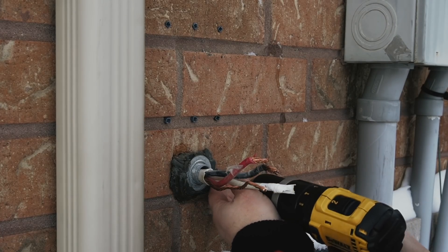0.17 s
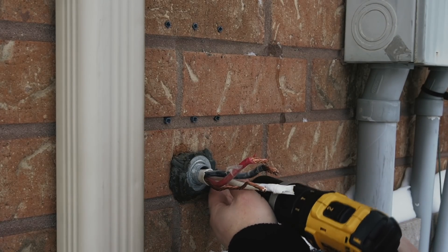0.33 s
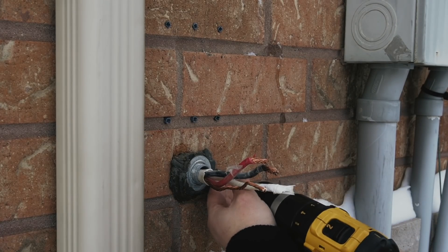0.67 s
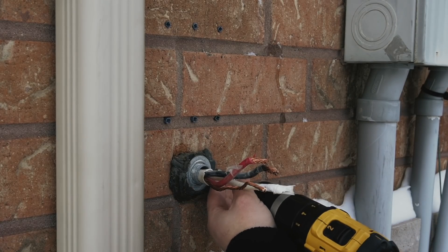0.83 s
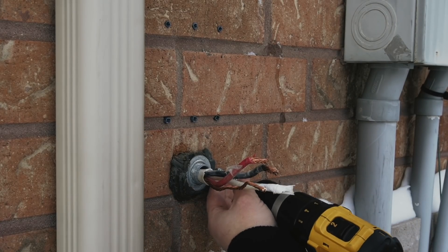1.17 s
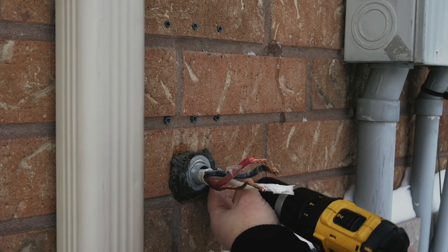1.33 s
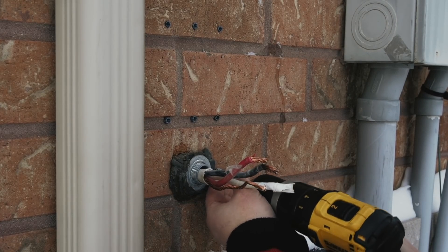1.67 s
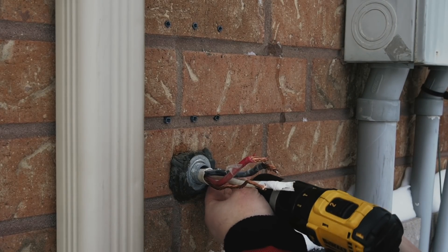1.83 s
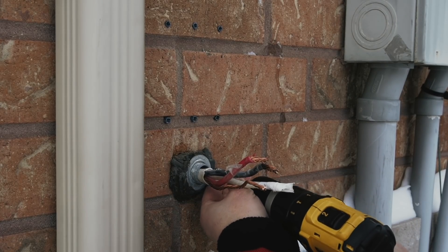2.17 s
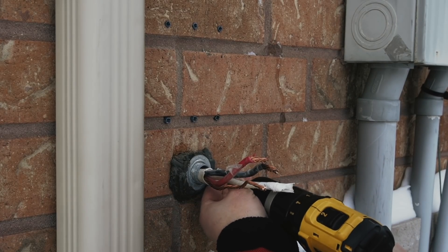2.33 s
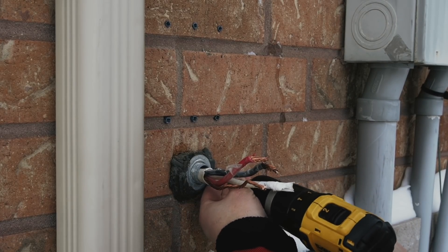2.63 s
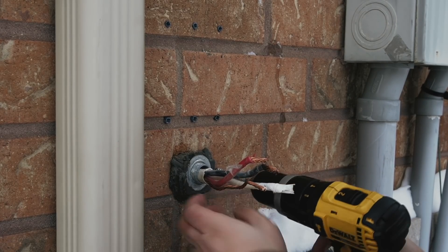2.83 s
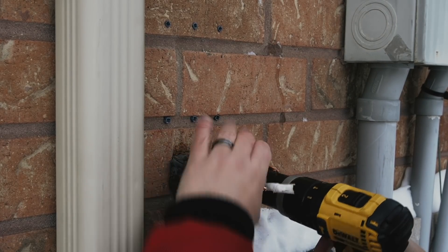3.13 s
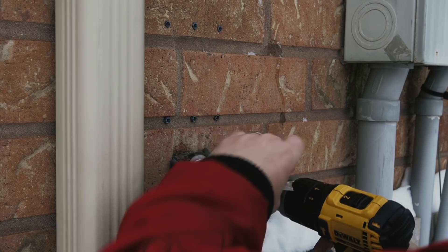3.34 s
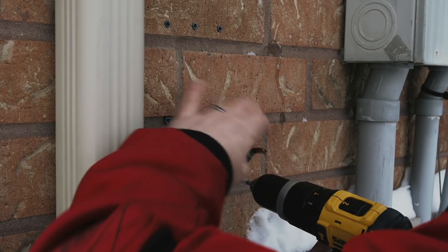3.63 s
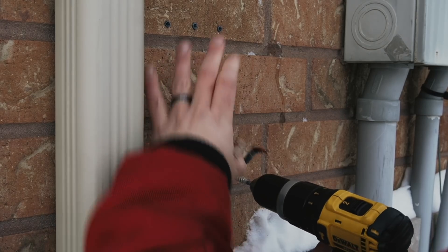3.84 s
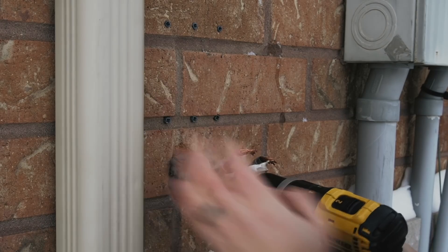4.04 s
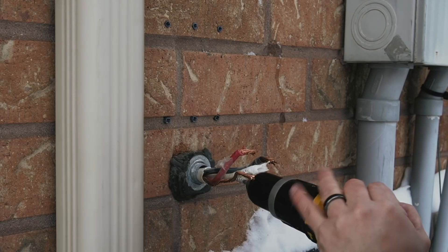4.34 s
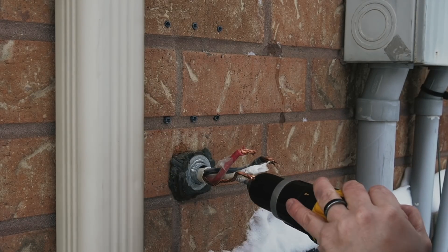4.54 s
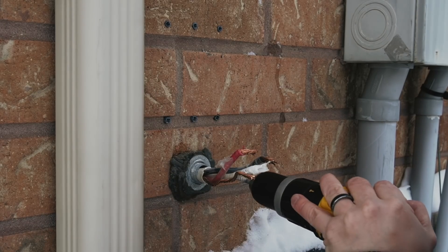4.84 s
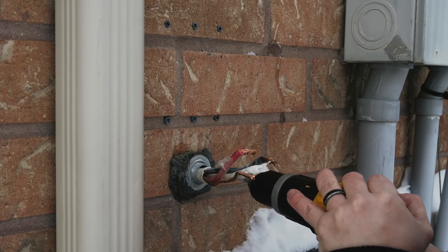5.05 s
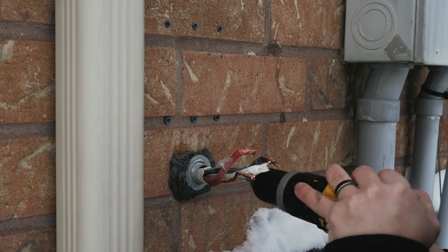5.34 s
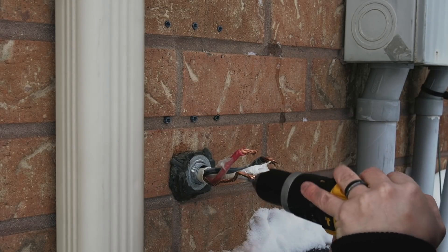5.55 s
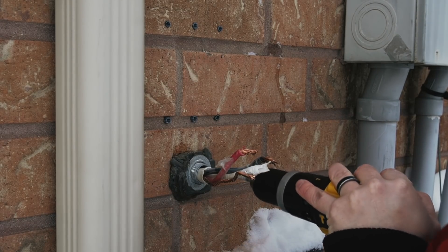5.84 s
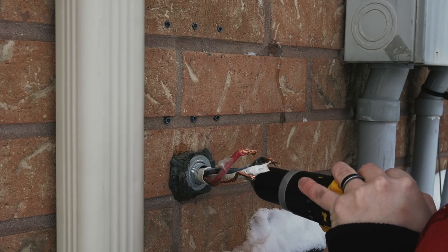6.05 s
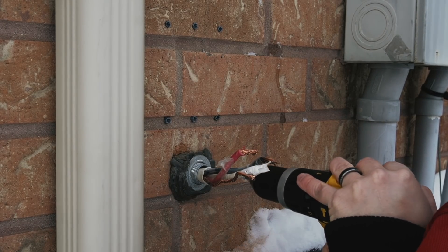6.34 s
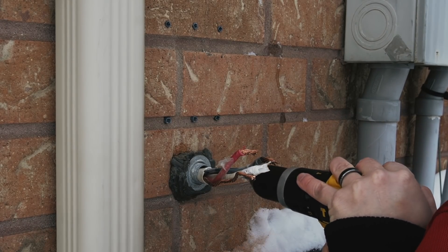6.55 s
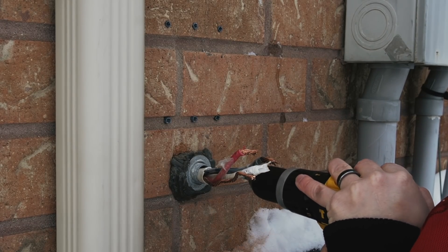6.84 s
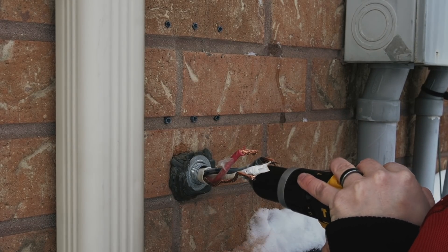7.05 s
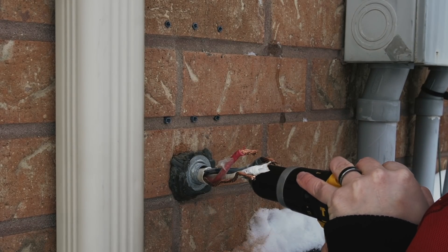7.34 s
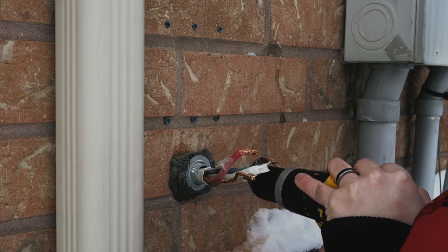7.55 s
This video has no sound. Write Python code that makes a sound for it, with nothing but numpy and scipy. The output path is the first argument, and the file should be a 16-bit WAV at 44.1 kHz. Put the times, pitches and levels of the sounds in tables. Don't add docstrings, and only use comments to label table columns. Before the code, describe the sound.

Outdoors, very close to a hammer drill against brick. From 0 to 0.5 s the chuck creeps: about seventeen uneven, bright ratchet clacks with dull thuds slow down under a thin whistle near 4 kHz. Small grip creaks and faint wind fill the gap until a lone clack at 1.4 s. Two more blows lead into a rough run at 1.7 s, hammering around 47 blows a second, then rising near 2.4 s to a dense rattle of about 130, stopping at 2.85 s. In the pause come light clinks at 3.1 s, ticks around 3.7 s, a hard knock at 4.0 s and sharp switch clicks at 4.26 and 4.36 s. Whistle and gritty grinding return at 4.5 s; the blows accelerate and by 5.4 s merge into a harsh, slightly wavering buzz near 430-460 Hz, steady to the end at 7.7 s. Faint yard echo and far wash.

```python
import sys
import numpy as np
from scipy import signal
from scipy.io import wavfile
from scipy.ndimage import uniform_filter1d

SR = 44100
rng = np.random.default_rng(int(sys.argv[2]) if len(sys.argv) > 2 else 0)


def amp(db):
    return 10 ** (np.asarray(db, float) / 20)


def write(x):
    x = np.atleast_2d(x).T
    wavfile.write(sys.argv[1], SR, np.round(np.clip(x, -1, 1) * 32767).astype(np.int16))


N = 339129


def evened(x):
    return x / np.sqrt(np.mean(x ** 2) + 1e-20)


def drift(size):
    return evened(uniform_filter1d(uniform_filter1d(rng.standard_normal(N), size), size))


def read(points, hz):
    f, value = np.transpose(points)
    return np.interp(np.log(hz + 1), np.log(f + 1), value)


def add(mix, s, sound):
    part = mix[round(s * SR):][:len(sound)]
    part += sound[:len(part)]


def colour(x, shape_db):
    hz = abs(np.fft.fftfreq(8192, 1 / SR))
    log_gain = np.log(amp(np.maximum(shape_db(hz), -100)))
    taps = np.fft.ifft(np.exp(np.conj(signal.hilbert(log_gain)))).real[:4096]
    return signal.oaconvolve(x, taps / np.linalg.norm(taps))[:len(x)]


def slope(hz, corner_hz, db_per_octave):
    return -np.maximum(db_per_octave * np.log2((hz + 1) / corner_hz), 0)


def poles_at(hz, width):
    r = np.exp(-np.pi * width / SR)
    return [1, -2 * r * np.cos(2 * np.pi * hz / SR), r * r]


def resonate(x, hz, width):
    return signal.lfilter([1, 0, -1], poles_at(hz, width), x)


def dispersed(x, hz, width):
    poles = poles_at(hz, width)
    return signal.lfilter(poles[::-1], poles, x)


def bursts(train, delay_s, t60, rise_s):
    t = np.maximum(np.arange(2048) / SR - delay_s, 0)
    power = (1 - np.exp(-t / rise_s)) ** 2 * amp(-120 * t / t60)
    envelope = np.sqrt(abs(signal.oaconvolve(train ** 2, power / power.sum())[:N]))
    return envelope * rng.standard_normal(N)


# t/s, level/dB
SLOW_RUN = [
    (1.682, -20.5),
    (1.85, -18),
    (1.95, -18.5),
    (2.07, -15),
    (2.33, -16),
    (2.42, -13),
    (2.79, -14.5),
    (2.832, -19),
    (2.85, -61),
]
FAST_RUN = [
    (4.583, -18),
    (5.05, -19),
    (5.45, -20.5),
    (7.69, -21.5),
]
# t/s, blows per second f/Hz
SLOW_RATE = [(1.682, 47.4), (2.045, 47.4), (2.1, 60), (2.31, 66), (2.41, 117), (2.47, 125), (2.62, 130),
             (2.72, 128), (2.85, 104)]
SPIN_UP = [(4.583, 99.6), (4.65, 147.4), (4.85, 90.26), (4.91, 149.9), (5.02, 231.5), (5.11, 396.3),
           (5.18, 453.7), (5.27, 411.4), (5.42, 469)]
FULL_RATE = [(5.47, 459), (5.85, 446.5), (6.03, 441), (6.31, 437.7), (6.66, 442), (7.19, 426.5),
             (7.3, 430.3), (7.62, 425), (7.69, 430)]
RUN_TRIM_DB = [-1, 4.5]
TICK_DB = [-10, 0.5]
PUSH_DB = [-2, 3.5]
# t/s, peak level/dB, tick over the blow level/dB
BLOWS = [(0.0014, -4, -8), (0.0231, -5.5, -4), (0.0503, -10, -6), (0.0732, -12.5, -15), (0.0868, -9.5, -7),
         (0.1072, -9.5, -14), (0.124, -9, -9), (0.1486, -6.5, -4), (0.172, -12, -12), (0.1874, -12, -16),
         (0.205, -9, -6), (0.2324, -22, -8), (0.259, -8.5, -26), (0.3061, -10, -9), (0.3561, -10.5, -9.5),
         (0.4094, -16, -12), (0.5137, -23, -20), (1.4225, -4.5, -33), (1.6013, -3.5, -6), (1.6466, 0.5, -9),
         (4.5262, 5, -12), (4.566, 5.5, -9)]
TEETH = 17
WORN_DB, TICK_SPREAD_DB = .8, 2.5
TICK_DB_PER_OCTAVE = 3.2
LOOSE_TICK_DB = 1.5
LOCKED_PUSH_DB, LOCKED_THUD_DB = -29, -4
SLACK_HZ, SLACK_WIDTH_HZ, SLACK_DB = 2253, 650, -17


def drill_run(layers, worn, speed, effort, trim_db, snap_db, shove_db):
    clatter, tick, push, thud = layers
    s, effort_db = np.transpose(effort)
    start = speed[0][0]
    t = np.arange(start, s[-1], 1 / SR)
    rate = np.interp(t, *np.transpose(speed))
    clatter_db = np.interp(t, s, effort_db)
    chatter = loose(t)
    fast = np.clip(rate / 200 - 1, 0, 1)
    octaves = np.log2(rate / rate.max())
    tick_db = clatter_db + snap_db + TICK_DB_PER_OCTAVE * octaves + LOOSE_TICK_DB * chatter * fast
    push_db = clatter_db + shove_db + LOCKED_PUSH_DB * (1 - chatter) - 5.2 * fast
    thud_db = clatter_db + trim_db - 7 + LOCKED_THUD_DB * (1 - chatter)

    at = np.flatnonzero(np.diff(np.floor(np.cumsum(rate) / SR), prepend=-1))
    teeth = np.zeros(len(t))
    teeth[at] = np.sqrt(SR / rate[at])
    uneven = teeth * amp(1.6 * rng.standard_normal(N)[:len(t)])
    uneven[at] *= amp(WORN_DB * np.resize(worn, len(at)))
    seated = amp(-22 * np.clip((rate - 220) / 200, 0, 1))
    steadier = teeth + chatter * (uneven - teeth)

    add(clatter, start, uneven * amp(clatter_db + trim_db))
    add(tick, start, uneven * amp(tick_db + TICK_SPREAD_DB * rng.standard_normal(N)[:len(t)]))
    add(push, start, (0.51 * teeth + 0.19 * steadier) * amp(push_db))
    add(thud, start, uneven * np.sqrt(seated) * amp(thud_db))


def hammer():
    clatter, tick, push, thud, lone = np.zeros((5, N))
    worn = evened(rng.standard_normal(TEETH))
    speeds, efforts = (SLOW_RATE, SPIN_UP + FULL_RATE), (SLOW_RUN, FAST_RUN)
    for run in zip(speeds, efforts, RUN_TRIM_DB, TICK_DB, PUSH_DB):
        drill_run((clatter, tick, push, thud), worn, *run)
    for s, peak_db, tick_db in BLOWS:
        add(lone, s, np.array([amp(peak_db + 7)]))
        add(tick, s, np.array([amp(peak_db + tick_db + 6.0)]))
        add(push, s, np.array([amp(peak_db + 1.5)]))
        add(thud, s, np.array([amp(peak_db + 0.5)]))

    early = np.roll(tick, -round(0.00362 * SR))
    bright = 0.71 * bursts(early, 0, 0.02, 0.0002) + .7 * bursts(tick, 0, 0.009, 0.0005)
    rattle = bursts(clatter, 0, 0.016, 0.0018)
    rattle += 0.3 * bursts(clatter, 0.0069, 0.031, 0.0019)
    rattle += bursts(lone, 0, 0.019, 0.0012)
    slack = rattle * (np.arange(N) < SR * SLOW_RUN[-1][0] + 2000)
    chuck = resonate(resonate(slack, SLACK_HZ, SLACK_WIDTH_HZ), SLACK_HZ, SLACK_WIDTH_HZ)
    rattle += amp(SLACK_DB) * np.std(slack) * evened(chuck)
    dull = bursts(thud, 0, 0.064, 0.011)

    out = colour(bright, lambda hz: tool_db(hz) + slope(hz, 5550, -11.5))
    out += colour(rattle, lambda hz: tool_db(hz) + slope(hz, 1098, -22.5) + slope(hz, 5870, 19.0))
    out += colour(dull, lambda hz: tool_db(hz) + slope(hz, 970, 11.8) + slope(hz, 250, -15))
    seat = np.roll(push, round(.0006 * SR))
    for hz in (500, 1000, 1900, 3300, 5500):
        seat = dispersed(seat, hz, .6 * hz)
    return out + colour(seat, lambda hz: tool_db(hz) + slope(hz, 530, 8.0))


# f/Hz, level/dB per Hz
TOOL = [(60, -24), (100, -3.5), (200, -9.5), (450, -5.5), (1100, 0), (1500, -2), (3500, -6.5), (6300, -15),
        (8000, -16.5), (14500, -21), (15700, -20.5), (16300, -57)]
# f/Hz, width f/Hz, level/dB
MODES_OF_TOOL = [(142.6, 59, 8.5), (219, 64, 8), (344, 53, 9.5), (561, 57, 11.5), (686.6, 66, 9.5),
                 (1343, 144, 3.5), (1500, 213, 8.5), (1857, 45, -4.5), (2020, 850, 4), (3030, 270, 6),
                 (4280, 1100, 8.5), (7705, 1820, 10.5), (8770, 2100, 5.5), (10480, 540, -8),
                 (13000, 5800, 11.5)]


def tool_db(hz):
    return read(TOOL, hz) + sum(db / (1 + (2 * (hz - f) / w) ** 2) for f, w, db in MODES_OF_TOOL)


LOCK_S, LOCK_SPAN_S = 5.42, .15


def loose(t):
    return np.clip((LOCK_S - t) / LOCK_SPAN_S, 0, 1)


# t/s, level/dB
SINGING = [
    (4.98, -37),
    (5.14, -22.5),
    (5.26, -23),
    (5.42, -19.5),
    (6.0, -19),
    (7.69, -19),
]
SINGING_HZ = [427, 440, 456, 500]
# multiple, then level/dB over the song at each of those four rates
SINGING_ORDERS = [(1, -8.5, 0, 1, -4.5), (2, 0.5, 0, 0, -1), (3, 1, -0.5, 1, 0.5), (4, 4.5, 0, -12, -9),
                  (5, -1, -8, -2, -1.5), (6, -16, -16, -16, -9), (7, -10, -6, -18, -15),
                  (9, -17, -25, -19, -19), (10, -14, -14, -12.5, -11), (12, -25, -30, -25, -12)]
SETTLE_S = 0.41
CHUCK_DB, FREE_CHUCK_DB = -36.5, -7
GEAR_ORDER = 12.34


def singing():
    t = np.arange(N) / SR
    song_db = np.interp(t, *np.transpose(SINGING), left=-99)
    rate = np.interp(t, *np.transpose(SPIN_UP + FULL_RATE))
    unsettled = loose(t)
    rough = np.exp(-np.maximum(t - LOCK_S, 0) / SETTLE_S)
    jitter = (.003 + .004 * unsettled + .007 * rough) * drift(size=200)
    blows = np.cumsum(rate * (1 + jitter)) / SR

    flicker_db = 0.49 + 1.3 * unsettled + 1.12 * rough
    tone = np.zeros(N)
    for k, *order_db in SINGING_ORDERS:
        db = song_db + np.interp(rate + 100 * unsettled, SINGING_HZ, order_db)
        level = amp(db + flicker_db * drift(size=400))
        tone += level * np.sin(2 * np.pi * (k * blows + rng.random() * (k > 2)))

    low_orders = np.sin(2 * np.pi * blows) + .35 * np.sin(4 * np.pi * blows)
    chuck = 2 * np.cos(2 * np.pi * blows / TEETH) * low_orders
    chuck *= amp(CHUCK_DB + np.interp(rate, SINGING_HZ[:2], [0, FREE_CHUCK_DB]))
    gear = np.sin(2 * np.pi * GEAR_ORDER * np.cumsum(rate) / SR) * amp(-32.5 + 1.2 * drift(size=1500))
    gear += np.sin(2 * np.pi * .67 * blows) * amp(-46.5 + 2.5 * drift(size=300))
    return np.sqrt(2) * (tone + (chuck + gear * (1 - rough)) * (1 - unsettled))


# on t/s, off t/s, whistle level/dB, grinding level/dB, loading time t/s
THROTTLE = [
    (-.3, .46, -38, -43, .05),
    (1.532, 2.204, -37, -34, 0.028),
    (4.492, 5.027, -28, -25.5, 0.039),
]
WHISTLE_HZ = [3951, 3956, 3960]
# multiple, level/dB
WHISTLE_ORDERS = [(1, 0), (2, -6), (3, -21)]
WHISTLE_FALL_DB_PER_S, GRIND_FALL_DB_PER_S = 4000, 330
GRIND_START_DB = -36
WHISTLE_SHAKE_DB = 5


def throttle():
    whistle, grind = np.zeros((2, N))
    for (on, off, whistle_db, grind_db, lag_s), hz in zip(THROTTLE, WHISTLE_HZ):
        t = np.arange(max(on, 0), off + .3, 1 / SR)
        unloaded = np.exp(-abs(t - on) / lag_s)
        after = np.maximum(t - off, 0)
        tone = sum(amp(db) * np.sin(2 * np.pi * k * hz * t) for k, db in WHISTLE_ORDERS)
        add(whistle, t[0], np.sqrt(2) * tone * amp(whistle_db - WHISTLE_FALL_DB_PER_S * after))
        add(grind, t[0], amp(grind_db + GRIND_START_DB * unloaded - GRIND_FALL_DB_PER_S * after))
    lumps_db = 2.8 * evened(uniform_filter1d(rng.standard_normal(N), 90))
    grit = rng.standard_normal(N) * amp(lumps_db)
    whistle *= amp(WHISTLE_SHAKE_DB * grind / grind.max() * drift(size=120))
    return whistle + colour(grind * evened(grit), lambda hz: 1.03 * tool_db(hz))


# t/s, peak
# level/dB, ring f/Hz, t60 t/s
THUMPS = [
    (.004, -24, 197, .17),
    (.018, -20, 380, 0.12),
    (.185, -28.5, 545, 0.12),
    (2.845, -25.5, 203, .3),
    (2.846, -29, 398, 0.18),
    (4.0181, -1.5, 540, 0.028),
    (4.019, -23, 257, 0.14),
    (4.048, -13.5, 820, 0.062),
    (4.3585, -33, 3500, .012),
    (4.3635, -42, 3500, .012),
]
TICKS = [(0.144, -21, 2300, .033), (0.189, -21, 2670, .05), (.198, -24, 2500, .03), (0.233, -23, 3200, .02),
         (.555, -46, 5500, .015), (.971, -28.5, 1290, 0.046), (.972, -31, 600, .03),
         (3.423, -38, 5000, .012), (3.648, -34, 4500, 0.022), (3.724, -28, 1600, 0.029),
         (3.737, -24.5, 1500, 0.067), (3.995, -39, 4800, .01), (4.019, -7.5, 1260, 0.067),
         (4.024, -18.5, 2200, 0.063), (4.267, -11.5, 7260, 0.012), (4.2665, -27, 3440, 0.0098),
         (4.3, -34, 4000, .03), (3.737, -23.5, 895, 0.051), (3.883, -34, 1500, .02),
         (4.093, -35, 4800, .015), (4.2635, -2, 2660, .017)]
CLINKS = [
    (3.108, -41, 2080, 0.044),
    (3.108, -36, 3940, 0.083),
    (3.109, -36, 7760, 0.071),
    (3.152, -37, 2960, .06),
    (3.152, -29.5, 3960, 0.078),
    (3.152, -33.5, 7900, 0.085),
    (4.018, -18, 8150, 0.034),
    (4.03, -24, 706, .2),
]
SNAPS = [
    (4.2625, -11.5, 1420, 0.017),
    (4.269, -14.5, 1440, .02),
    (4.359, -19, 1440, .02),
    (4.363, -20, 1440, .02),
]
# ring width as a share of its pitch, wide crack over the ring level/dB
STUFF = [
    (0.24, -27),
    (0.28, -7),
    (0.047, -5.5),
    (0.099, -20),
]


def knocks():
    out, t = np.zeros(N), np.arange(9000) / SR
    for rows, (share, crack_db) in zip((THUMPS, TICKS, CLINKS, SNAPS), STUFF):
        for s, peak_db, hz, t60 in rows:
            width = share * hz
            puff = rng.standard_normal(len(t)) * amp(-60 * t / t60)
            ring = resonate(resonate(0.071 * puff + (t == 0), hz, width), hz, 4.0 * width)
            crack = colour(puff, lambda f: slope(f, 2900, 12.0) + slope(f, 430, -9))
            sound = ring / abs(ring).max() + amp(crack_db) * crack / abs(crack).max()
            add(out, s, amp(peak_db) * sound)
    return out


# t/s, peak level/dB, length t/s, hiss over the grip level/dB
CREAKS = [(0.576, -24.5, 0.031, -8), (0.604, -26.5, 0.0074, -9), (.822, -38, 0.04, -9),
          (0.85, -38, 0.0043, -4), (0.89, -46, .025, -14), (1.012, -39.5, 0.02, -9), (1.05, -46, .006, -6),
          (1.076, -44, 0.0063, -8), (1.137, -33.5, 0.023, -16), (1.259, -39.5, 0.033, -21),
          (1.359, -37, 0.024, -6), (1.538, -39, .01, 8), (1.403, -40, 0.0051, -3), (1.421, -23, 0.015, -4),
          (3.729, -37, 0.022, 6.5), (3.852, -45, 0.045, 13), (4.025, -35, 0.04, 10), (4.193, -48, 0.089, 7),
          (4.29, -50, .025, -2)]
# f/Hz, width f/Hz, level/dB
GRIP = [(1400, 660, 13), (2680, 360, 15), (3200, 470, 13.5), (4160, 610, 4), (8330, 880, 9.5),
        (14200, 1500, -2)]


def creaks():
    out, t = np.zeros(N), np.arange(9000) / SR
    for s, peak_db, length, hiss_db in CREAKS:
        slips = rng.standard_normal(len(t)) * amp(4.7 * rng.standard_normal(len(t) // 50).repeat(50))
        slips *= np.exp(-(t / length) ** 4)
        grip = np.zeros(len(t))
        for hz, width, db in GRIP:
            grip += amp(db) * evened(resonate(resonate(slips, hz, width), hz, width))
        hiss = colour(slips, lambda f: slope(f, 1500, -28) + slope(f, 7000, 6.5))
        sound = grip / abs(grip).max() + amp(hiss_db) * hiss / abs(hiss).max()
        add(out, s, amp(peak_db) * sound)
    return out


# f/Hz, t60 t/s
YARD = [(100, 0.9), (220, 0.77), (500, 0.46), (2000, 0.2), (8000, 0.23)]


def yard(x):
    taps = np.zeros(SR // 2)
    at = np.arange(300, SR // 2 - 20, 20)
    taps[at + rng.integers(0, 20, len(at))] = rng.choice([-1., 1.], len(at))
    hz, t, z = signal.stft(taps, SR, nperseg=256)
    tail = signal.istft(z * amp(-60 * t / read(YARD, hz)[:, None]), SR, nperseg=256)[1]
    return signal.fftconvolve(x, tail / np.linalg.norm(tail))[:N]


# f/Hz, level/dB per Hz
WASH = [(59, -31), (100, -9.5), (178, -0.5), (290, -5.5), (1060, -7.5), (3730, -28), (8390, -30.5),
        (10400, -42.5), (13700, -36), (16200, -41)]
# t/s, level/dB
RUSTLE = [
    (.5, -47),
    (.55, -70),
    (1.35, -69),
    (1.5, -59),
    (4, -60),
    (4.13, -55),
    (4.5, -59),
]
# t/s, level/dB, half length t/s
GUSTS = [(.3, -41, 0.5), (1.094, -36.5, 0.36), (1.6, -53, .15), (2.114, -31, 0.12), (2.5, -36, 0.17),
         (2.948, -48, 0.29), (4.72, -39, 0.17), (4.9, -35, .04), (5.399, -53, .2), (6.2, -48, .17),
         (6.8, -42, 0.29)]
WASH_DB, CALM_DB = -48, -49


def outdoors():
    t = np.arange(N) / SR
    wash = amp(WASH_DB + 0.34 * drift(size=3000))
    wash = wash * colour(rng.standard_normal(N), lambda hz: read(WASH, hz) + slope(hz, 2100, 9.6))
    rustle = colour(rng.standard_normal(N), lambda hz: read(WASH, hz) + slope(hz, 2800, -22))
    rustle_db = np.interp(t, *np.transpose(RUSTLE))
    lumps = colour(rng.standard_normal(N), lambda hz: slope(hz, 23.6, 8) + slope(hz, 4.4, 2.9))
    wind = amp(CALM_DB) + sum(amp(db) * np.exp(-((t - s) / half) ** 2) for s, db, half in GUSTS)
    return wash + amp(rustle_db) * rustle + wind * evened(lumps)


def scene():
    near = hammer() + singing() + throttle() + knocks() + creaks()
    mono = near + amp(-21.0) * yard(near) + outdoors()
    return np.tile(mono, (2, 1))


def low_pass(x):
    return signal.sosfilt(signal.butter(12, 16380, fs=SR, output="sos"), x)


def record(dry):
    ceiling = 0.87
    mix = dry / (1 + (dry / ceiling) ** 4) ** 0.29
    return low_pass(mix)


dry = scene()
out = record(dry)
write(out)
```